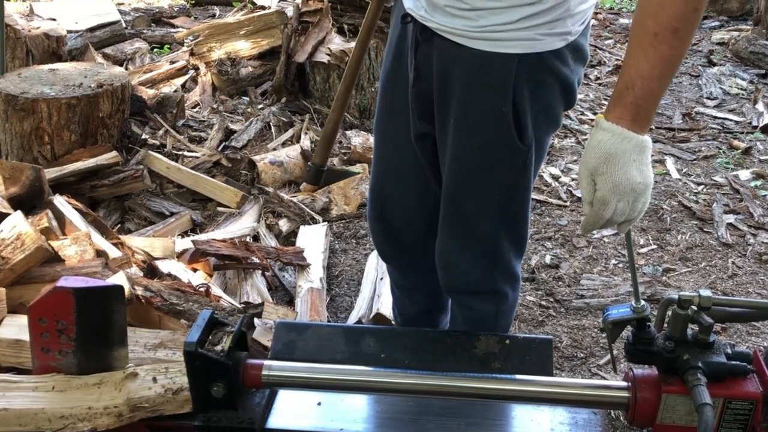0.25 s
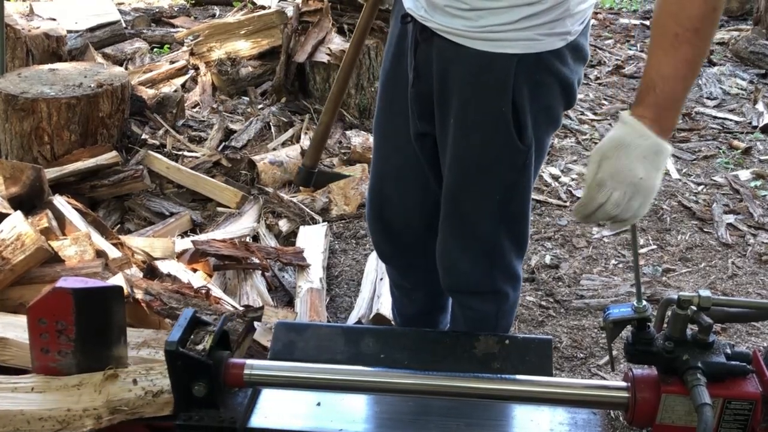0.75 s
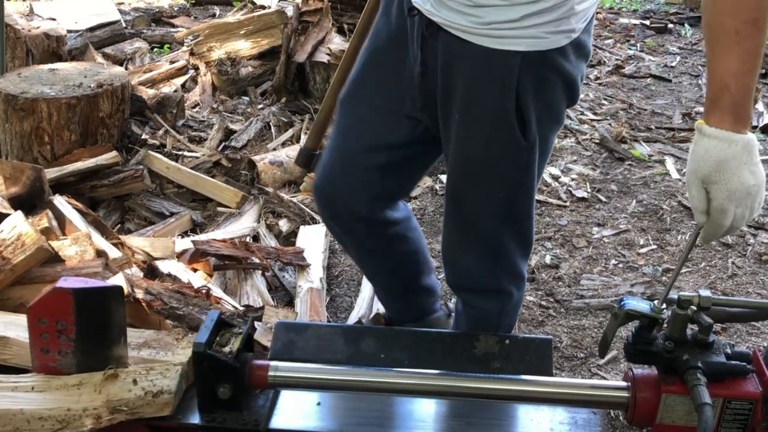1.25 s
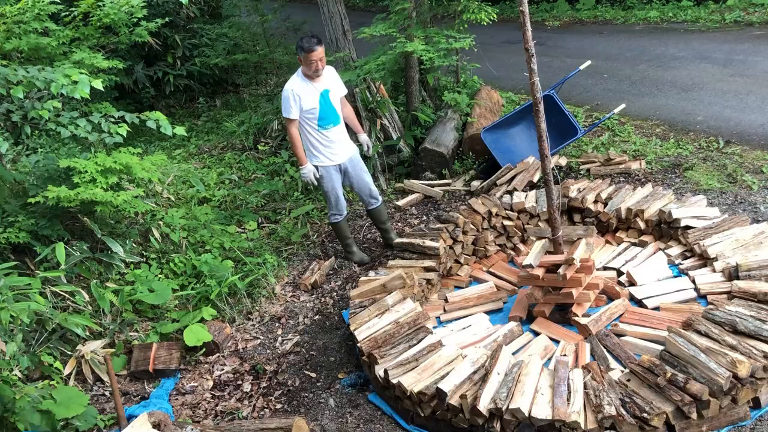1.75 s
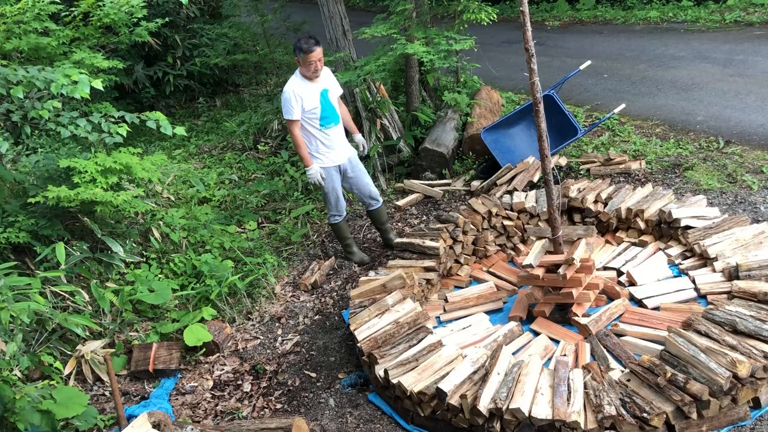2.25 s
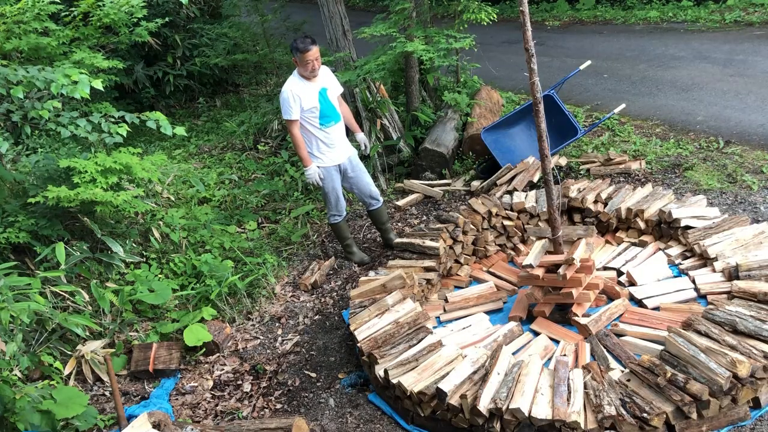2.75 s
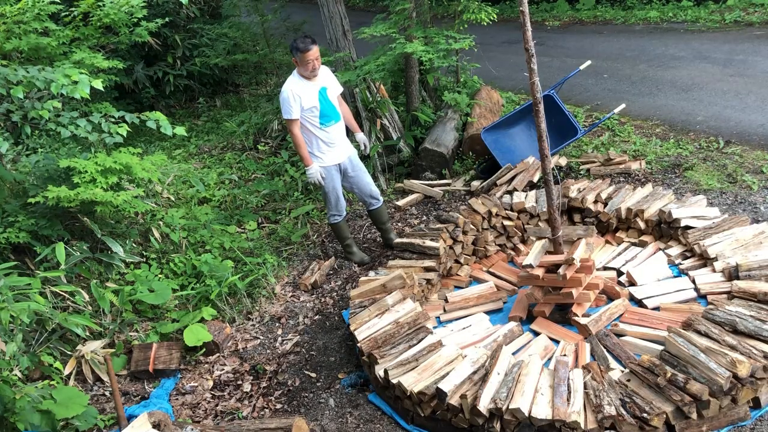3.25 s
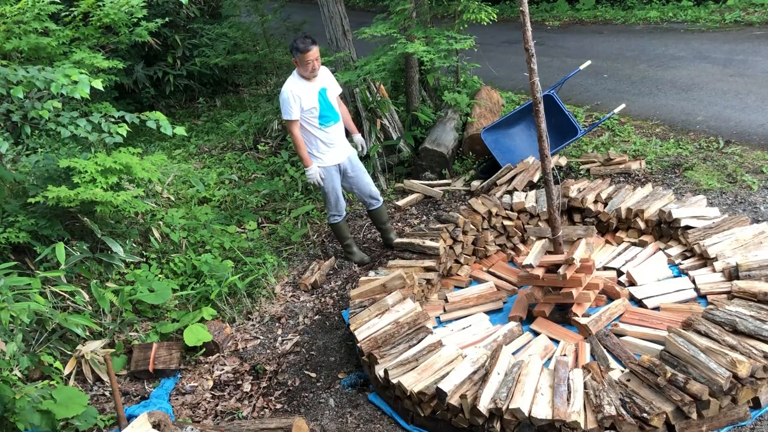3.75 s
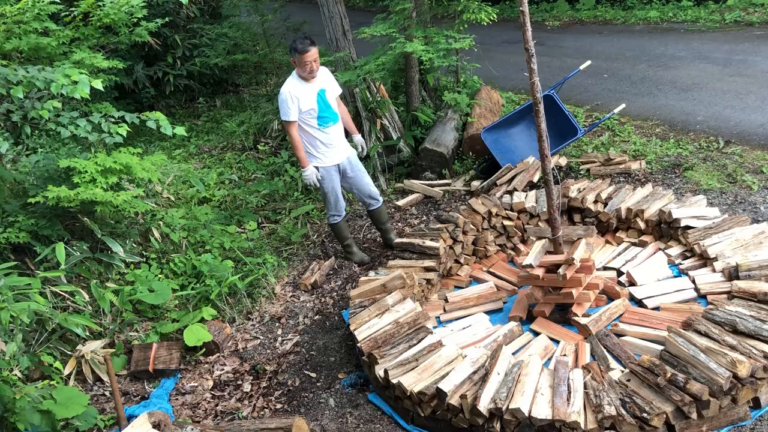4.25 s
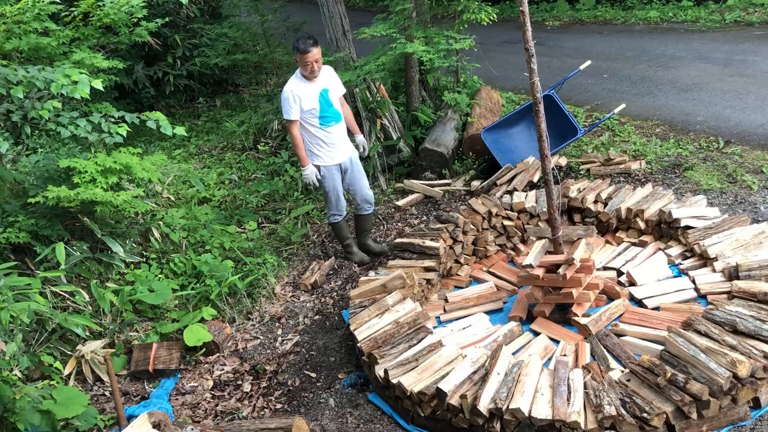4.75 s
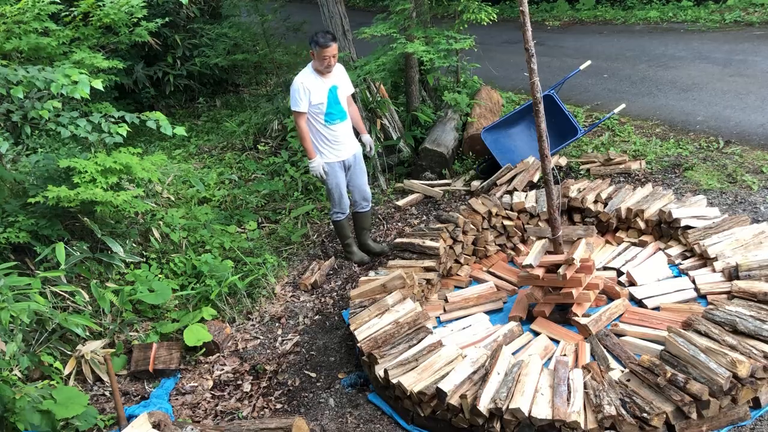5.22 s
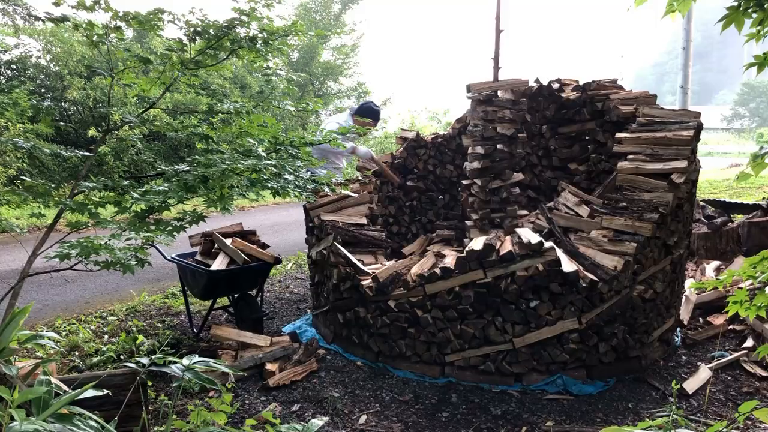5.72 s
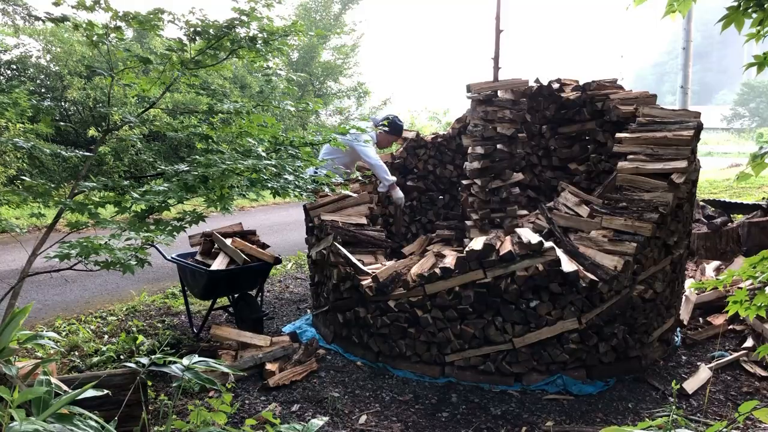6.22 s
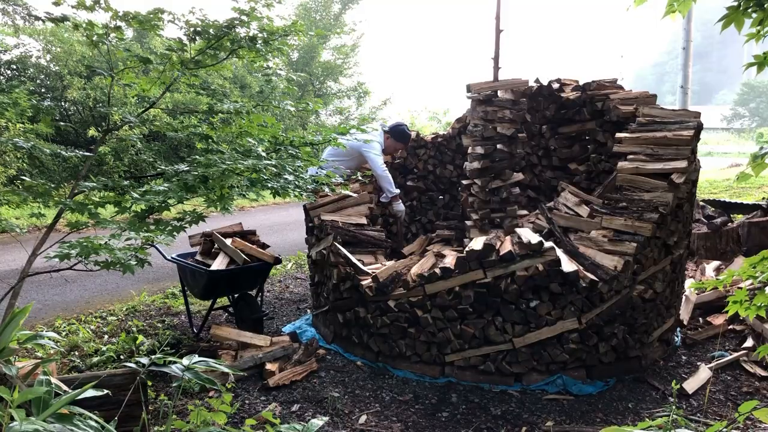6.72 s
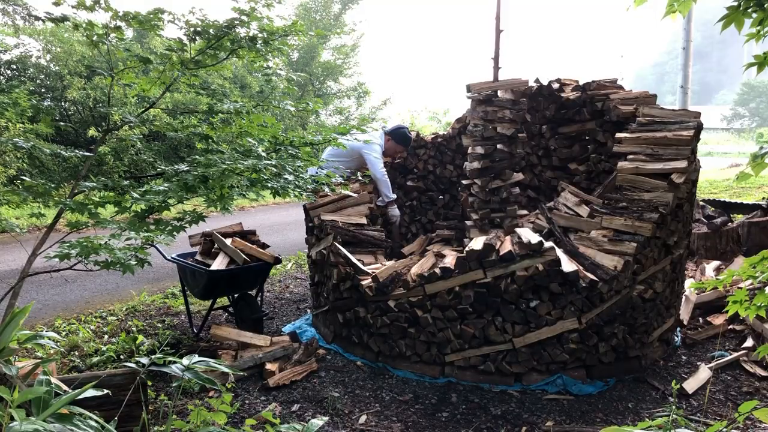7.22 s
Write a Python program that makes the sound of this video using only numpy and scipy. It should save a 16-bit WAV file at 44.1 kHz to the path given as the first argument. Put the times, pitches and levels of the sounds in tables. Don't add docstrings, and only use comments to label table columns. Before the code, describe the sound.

From 0 to 1.66 s a small single-cylinder engine runs loud and close, about 21 firings a second, with throaty exhaust, tinny casing clatter, thin pump whine and a high metallic squeal. Grainy wood snaps scatter over it. From 0.75 it bogs down to about 15 firings; the ram knocks its rail near 0.9-1.0, the hardest cracks land at 0.93 and 0.99, then speed recovers. At 1.66 it cuts dead to a very quiet yard with soft distant hush. A near bird gives brief arched whistles roughly every 0.3 s, alternating high and low, echoing among trees until 5.3. Leaves rustle and twigs tick at 4.6-4.9. At 5.49 the air thins: a falling bird slide at 5.75, a dull log at 5.87, high chirps and throbbing buzzes at 6.1-6.6, a light knock at 6.59, a log set down at 7.33, then a hard bouncing knock at 7.41.

```python
import sys
import numpy as np
from scipy import signal
from scipy.fft import rfft, irfft
from scipy.io import wavfile
from scipy.ndimage import uniform_filter1d

SR = 44100
rng = np.random.default_rng(int(sys.argv[2]) if len(sys.argv) > 2 else 0)


def generate_wav(sig):
    pcm = np.round(np.clip(np.atleast_2d(sig).T, -1, 1) * 32767).astype(np.int16)
    wavfile.write(sys.argv[1], SR, pcm)


def gain_from_decibels(decibels):
    exponent = np.asarray(decibels, float) / 20
    return 10 ** exponent


N = 329868
TIME = np.arange(N) / SR
CUTS = (1.657, 5.491)
FIRST_TURN = .287


def evened(x):
    return x / np.sqrt(np.mean(x ** 2) + 1e-20)


def add(mix, s, sound):
    part = mix[round(s * SR):][:len(sound)]
    part += sound[:len(part)]


def along(rows, t):
    s, *columns = np.transpose(rows)
    return [np.interp(t, s, c) for c in columns]


def coloured(x, points):
    hz = np.fft.rfftfreq(len(x), 1 / SR)
    f, db = np.transpose(points)
    gain = gain_from_decibels(np.interp(np.log(hz + 1), np.log(f + 1), db))
    return evened(irfft(rfft(x) * gain, len(x)))


def resonate(x, hz, width):
    turn = np.exp(2j * np.pi * np.cumsum(hz * np.ones(len(x))) / SR)
    r = np.exp(-np.pi * width / SR)
    return 2 * (turn * signal.lfilter([1 - r], [1, -r], x / turn)).real


def resonate_twice(x, hz, width):
    return resonate(resonate(x, hz, width), hz, width)


def ring(hz, t60, rise, size=6000):
    t = TIME[:size]
    return np.sin(2 * np.pi * hz * t) * gain_from_decibels(-60 * t / t60) * (1 - np.exp(-t / rise))


def woods(x, t60, wet_db):
    t = TIME[:SR // 2]
    tree_line = gain_from_decibels(-6.0) * np.exp(-((t - .17 * t60) / (.07 * t60)) ** 2)
    fall = gain_from_decibels(-60 * t / t60) + gain_from_decibels(-8 - 60 * t / (2.2 * t60)) + tree_line
    sparse = rng.standard_normal(len(t)) * (rng.random(len(t)) < .01)
    taps = sparse * fall * (t > .006) * (1 - np.exp(-t / 0.0095))
    return x + gain_from_decibels(wet_db) * signal.fftconvolve(x, taps / np.linalg.norm(taps))[:N]


def engine():
    # [start_s, firings_per_s]
    speeds = [
        (0.0, 20.94),
        (0.72, 20.72),
        (0.79, 18.8),
        (0.91, 15.07),
        (0.96, 15.4),
        (1.0, 19.2),
        (1.2, 20.15),
        (1.66, 20.42),
    ]
    # [start_s, level_db]
    pressure = [
        (0, -41.5),
        (.74, -41),
        (.82, -33.5),
        (.89, -53),
        (1.0, -45),
        (1.1, -36),
        (1.65, -40),
    ]
    t = TIME[:round(CUTS[0] * SR)]
    speed = along(speeds, t)[0]
    turns = FIRST_TURN + np.cumsum(speed) / SR
    load = 1 - speed / speed[0]
    white = rng.standard_normal(len(t))
    gate_db = valve_gate(turns)
    wobble = uniform_filter1d(rng.standard_normal((2, len(t))), 300)
    teeth = np.sin(2 * np.pi * 48 * turns + (10 + 80 * load) * wobble[0])
    whine = teeth * gain_from_decibels(40 * wobble[1] - 1 - 40 * load + along(pressure, t)[0])
    squeal = evened(resonate(white, 6550, 110) * gain_from_decibels(1.3 * gate_db)) * guard(t) * gain_from_decibels(-10.0)
    rattle = gain_from_decibels(-36.5 - 8 * load) * clatter(white, turns, gate_db)
    return gain_from_decibels(-34.5) * exhaust(turns, speed) + rattle + whine + squeal


def exhaust(turns, speed):
    # [delay_s, pitch_hz, t60_s, rise_s, level_db]
    strokes = [(0.0174, 69, 0.2, 0.012, -23.9), (0.0099, 95, 0.103, 0.012, -9.6),
               (0.0018, 179, 0.096, 0.012, -8.9), (0.0118, 277, 0.047, 0.0003, -18),
               (0.0083, 372, 0.048, 0.0009, -17.5), (0.0081, 520, 0.012, 0.0038, 0.0),
               (0.0156, 512, 0.11, 0.0007, -24), (0.0189, 611, 0.015, 0.0003, -16.6)]
    # [delay_s, pitch_hz, t60_s, rise_s, level_db]
    taps_and_rings = [(0.016, 1550, 0.003, 0.00088, -7.5), (0.031, 1490, 0.004, 0.0013, -13),
                      (0.013, 1200, .008, 0.00049, -36), (0.01236, 136.4, 0.044, 0.011, -19),
                      (0.01864, 645, 0.018, 0.0014, -33), (0.0047, 257, 0.069, 0.0085, -18.5)]
    rings = list(strokes) + list(taps_and_rings)
    lead = round(FIRST_TURN / speed[0] * SR)
    starts = np.r_[0, lead + np.flatnonzero(np.diff(np.floor(turns)))]
    spread = rng.standard_normal((len(starts), len(rings)))
    out = np.zeros(len(turns) + lead)
    for at, chances in zip(starts, spread):
        slowing = speed[max(at - lead, 0)] / speed[0]
        load = 1 - slowing
        for (delay, hz, t60, rise, db), chance in zip(rings, chances):
            sag = slowing ** (1 if t60 * hz > 50 else .15)
            boom_db = 28 * load * np.exp(-((hz - 135) / 50) ** 2)
            boom_db -= load * (30 * (200 < hz < 400) + 10 * (hz == 179) + 10 * (hz < 100))
            chance_db = (.4 + 1.5 * load) * (hz / 200) ** .5 * chance
            hit = gain_from_decibels(db + boom_db + chance_db) * ring(hz * sag, t60, rise)
            add(out, at / SR + delay / sag, hit)
    return evened(out[lead:])


def valve_gate(turns):
    # [cycle_share, width_share, level_db]
    valves = [(.1, 0.028, 3), (.27, 0.041, 4), (.47, 0.16, 4.5), (.72, 0.047, 2.5), (1.0, 0.034, 5)]
    gate_db = 0
    for at, width, db in valves:
        offset = (turns - at + .5) % 1 - .5
        gate_db = gate_db + db * np.exp(-(offset / width) ** 2)
    return gate_db


def clatter(white, turns, gate_db):
    # [pitch_hz, level_db per Hz]
    spectrum = [(30, -62), (100, -10), (250, -8), (320, -13.5), (600, -7.5), (750, -14.5), (850, -18.5),
                (1050, -11.5), (1950, -17), (2500, -15), (4930, -17.5), (6500, -23.5), (16000, -35)]
    # [pitch_hz, width_hz, level_db]
    panels = [(1134, 23, -17), (1370, 17, -22), (1506, 15, -12.5), (1803, 11, -18.5), (2420, 120, -11.5),
              (2720, 8.6, -12.5), (3600, 100, -16), (4060, 10, -16), (4900, 100, -25.5), (5500, 46, -29)]
    pattern = rng.standard_normal(2100)
    repeated = pattern[(turns % 1 * len(pattern)).astype(int)]
    repeated = signal.sosfilt(signal.butter(2, 700, "high", fs=SR, output="sos"), repeated)
    low = signal.butter(2, 2200, fs=SR, output="sos")
    drive = white + signal.sosfiltfilt(low, .85 * repeated - .3 * white) + .3 * repeated
    casing = sum(gain_from_decibels(db) * evened(resonate(drive, hz, width)) for hz, width, db in panels)
    return evened(gain_from_decibels(gate_db) * (coloured(drive, spectrum) + gain_from_decibels(-2.5) * casing))


def guard(t):
    # [start_s, level_db, t60_s]
    shakes = [
        (0, -35.5, 1.4),
        (.18, -37, .4),
        (.625, -29, .12),
        (.72, -50, .2),
        (.934, -46, .1),
        (.988, -20, .1),
        (1.038, -20, .08),
    ]
    level = 0
    for s, db, t60 in shakes:
        swell = 1 - np.exp(-np.maximum(t - s, 0) / 0.011)
        level = level + gain_from_decibels(db - 60 * (t - s) / t60) * swell * (t > s)
    return level


def cracks():
    # [start_s, peak_db, treble_db]
    snaps = [(0.0474, -27, -22), (0.092, -24, -19.5), (0.196, -23.5, -19), (0.2922, -34, -21),
             (0.482, -27, -23), (0.5694, -38, -6), (0.7226, -27, -20), (0.7681, -22.5, -18),
             (0.8114, -41, -18), (0.869, -24.5, -17), (0.9322, -13.5, -15.5), (0.9838, -27, -33),
             (0.9916, -11.5, -16), (1.045, -19.5, -18), (1.097, -30, -10), (1.1474, -33, -13),
             (1.297, -34, -12), (1.455, -37, -11)]
    # [pitch_hz, level_db per Hz]
    spectrum = [(590, -2.5), (1000, -3), (1810, 0), (2740, -5.5), (3580, 0.5), (5570, -0.5), (6250, -3.5),
                (9060, 0.5), (9830, -1), (16000, -9)]
    out, t = np.zeros(N), TIME[:4000]
    for s, db, treble_db in snaps:
        t60 = 0.023 * (1 - 0.015 * (db + 32))
        grain = gain_from_decibels(7.04 * uniform_filter1d(rng.standard_normal(len(t)), 30))
        colour = [(hz, level + (treble_db + 11.0) * (hz > 6000)) for hz, level in spectrum]
        fall = gain_from_decibels(-60 * t / t60) + gain_from_decibels(-20 - 60 * t / .1)
        fall = fall * (1 - np.exp(-t / .003)) ** 2
        add(out, s, gain_from_decibels(db + 4.0) * fall * grain * coloured(rng.standard_normal(len(t)), colour))
    return out


def judder():
    # [start_s, peak_db]
    rail_knocks = [
        (.905, -31),
        (.925, -31),
        (.967, -28),
        (.987, -28),
        (1.007, -26),
    ]
    out = np.zeros(N)
    for s, db in rail_knocks:
        add(out, s, gain_from_decibels(db) * ring(476, 0.032, .003))
    return out


def whistle(hz, db):
    rough = uniform_filter1d(rng.standard_normal(len(hz)), 60)
    tone = np.sin(2 * np.pi * np.cumsum(hz) / SR)
    return gain_from_decibels(db + 10.7 * rough) * tone * signal.windows.tukey(len(hz), .2)


def arch(rise, fall, db, top_hz, shape, warble):
    t = np.arange(-rise, fall, 1 / SR)
    climb_hz, drop_hz, climb_db, drop_db, lag = shape

    def bent(u):
        return abs(u / .02) ** np.where(u < 0, 2, 1.36)

    hz = top_hz - np.where(t < 0, climb_hz, drop_hz) * bent(t)
    hz = hz * (1 + warble * np.sin(2 * np.pi * 140 * t))
    return whistle(hz, db + 2.0 - np.where(t < lag, climb_db, drop_db) * bent(t - lag))


def near_bird():
    # [start_s, rise_s, fall_s, level_db, top_hz]
    notes = [(1.779, 0.02, .026, -47.5, 3300), (2.02, 0.023, .009, -49.5, 2680),
             (2.333, .02, 0.0085, -50.5, 3250), (2.642, 0.019, 0.0063, -51.5, 2685),
             (3.008, .028, 0.0045, -52, 3840), (3.258, 0.02, 0.013, -54.5, 2770),
             (3.532, 0.019, 0.028, -50.5, 3370), (3.778, 0.0207, 0.0047, -48.5, 2690),
             (4.094, 0.011, 0.034, -52.5, 3230), (4.402, .024, .008, -49, 2630),
             (4.683, 0.02, 0.016, -47, 3270), (5.004, 0.023, 0.0035, -53, 2560),
             (5.31, .019, 0.011, -53, 3200)]
    # [start_s, level_db]
    flicks = [(1.762, -57.5), (2.313, -60), (3.514, -58), (4.071, -58.5), (4.660, -58), (5.291, -62)]
    # [start_s, level_db, pitch_hz]
    hooks = [(2.048, -61, 2600), (2.662, -54, 2670), (3.288, -49, 2690), (3.804, -51, 2580),
             (4.433, -49, 2520), (5.030, -53, 2500)]
    # climb_hz, drop_hz, climb_db, drop_db, level_lag_s
    shape = (283, 223, 2.7, 6.8, 0.00092)
    out, u = np.zeros(N), np.linspace(0, 1, 750)
    for s, *row in notes:
        add(out, s, arch(*row, shape, 0.0022))
    for s, db in flicks:
        breath = resonate_twice(rng.standard_normal(len(u)), 2900 + 1900 * u, 1300)
        add(out, s, gain_from_decibels(db) * evened(breath) * np.sin(np.pi * u))
    for s, db, hz in hooks:
        add(out, s, whistle(hz * (1 - 0.26 * u), db - 14.0 * u))
    return woods(out, 0.62, -7.5) * (TIME < CUTS[1])


def handling():
    # [peak_s, level_db, swell_s, fade_s], each time for 12 dB
    shuffles = [
        (4.612, -70, .02, .1),
        (4.705, -64, .09, .06),
        (4.88, -64, .11, 0.06),
        (5.496, -68, .002, .045),
        (5.572, -75, .006, .025),
        (5.625, -76, .03, .09),
    ]
    # [start_s, peak_db, pitch_hz, width_hz, t60_s]
    ticks = [(4.6054, -52, 9000, 5000, .015), (4.7094, -38, 8000, 5000, .015),
             (4.87, -33, 5360, 4000, 0.018), (4.876, -49, 7500, 4000, 0.013),
             (4.9094, -62, 5000, 4000, .015), (5.645, -49, 7000, 6000, .02),
             (5.698, -43, 2000, 2000, 0.026), (5.752, -57, 7000, 1500, .02), (5.491, -56, 9000, 8000, .02),
             (5.796, -38, 4000, 2520, 0.056), (6.2594, -54, 11500, 2000, .02),
             (6.5887, -40.5, 6000, 6000, .02), (6.723, -44, 6800, 2000, .02),
             (6.7374, -42, 5500, 3000, .03), (7.3254, -41, 5000, 6000, .04), (7.335, -43, 3500, 4000, .04),
             (7.4092, -44, 6000, 7000, .015)]
    # [start_s, peak_db, pitch_factor]
    knocks = [
        (5.865, -44, 0.46),
        (5.876, -38, 0.49),
        (6.586, -46.5, 0.84),
        (7.317, -65, 0.53),
        (7.331, -46, 0.47),
        (7.4117, -26, 1.01),
        (7.4225, -38.5, 1.15),
        (7.433, -48, 1.4),
        (7.465, -49, 1.28),
    ]
    # [pitch_hz, level_db, t60_s]
    wood = [(300, -3, 0.034), (430, -11, 0.062), (505, 7.5, 0.03), (705, 2, 0.049), (794, 1.5, 0.032),
            (993, 3, 0.029), (1184, -7, 0.041), (1500, 0.5, 0.022), (2070, -22, 0.015), (2800, -12, 0.029),
            (4312, -9.5, .02), (5600, -17, .02)]
    out, t = np.zeros(N), TIME[:6000]
    for s, db, swell, fade in shuffles:
        span = np.arange(-2 * swell, 2 * fade, 1 / SR)
        lumps = gain_from_decibels(25. * uniform_filter1d(rng.standard_normal(len(span)), 80))
        crackle = rng.standard_normal(len(span)) * lumps
        leaves = evened(resonate(resonate(crackle, 6800, 9000), 7900, 12000))
        add(out, s + span[0], gain_from_decibels(db - 12 * abs(span) / np.where(span < 0, swell, fade)) * leaves)
    for s, db, hz, width, t60 in ticks:
        noise = evened(resonate_twice(rng.standard_normal(len(t)), hz, width))
        add(out, s, gain_from_decibels(db - 15.5 - 60 * t / t60) * (1 - np.exp(-t / .0007)) * noise)
    for s, db, factor in knocks:
        modes = sum(gain_from_decibels(d) * ring(hz * factor, t60, 0.0015) for hz, d, t60 in wood)
        scrape = evened(resonate(rng.standard_normal(len(t)), 1200 * factor, 1500 * factor))
        scrape = scrape * gain_from_decibels(-13.5 - 60 * t / 0.039) * (1 - np.exp(-t / 0.0012))
        add(out, s, gain_from_decibels(db - 9.5) * (modes + scrape))
    return woods(out, 0.09, -14.5)


def far_birds():
    # [start_s, rise_s, fall_s, level_db, top_hz]
    arches = [
        (6.132, .014, 0.04, -59, 6800),
        (6.273, 0.013, 0.028, -58, 6630),
    ]
    # [start_s, length_s, level_db, from_hz, towards_hz]
    slides = [
        (5.701, 0.029, -59.5, 5180, 4270),
        (5.747, 0.21, -62.5, 5060, 2950),
        (6.135, 0.029, -71, 2750, 6000),
        (6.232, .03, -75, 2900, 4300),
    ]
    # [start_s, level_db, pitch_hz, t60_s, fuzz_db]
    buzzes = [(6.04, -77, 7750, 0.47, -9), (6.107, -61.5, 8020, 0.39, -2.5), (6.42, -71, 7700, .4, -1),
              (6.527, -67, 7400, 0.38, -1), (6.955, -80, 7900, .4, 5), (7.03, -74.5, 7140, 0.32, 3.5),
              (7.195, -77, 7600, .25, 4), (7.302, -70, 6400, .06, -20), (7.323, -57, 6100, 0.065, -20),
              (7.431, -62, 6200, .025, -20), (7.445, -59, 6250, .04, -20), (7.453, -58.5, 6000, .07, -20)]
    # climb_hz, drop_hz, climb_db, drop_db, level_lag_s
    shape = (4100, 1350, 6.4, 13, 0.011)
    out, t = np.zeros(N), TIME[:9000]
    for s, *row in arches:
        add(out, s, arch(*row, shape, 0.045))
    for s, length, db, from_hz, to_hz in slides:
        u = np.arange(0, length, 1 / SR)
        hz = to_hz + (from_hz - to_hz) * np.exp(-u / .1)
        add(out, s, whistle(hz * (1 + .006 * np.sin(2 * np.pi * 140 * u)), db + 3.5 - 64 * u))
    for s, db, hz, t60, fuzz_db in buzzes:
        white = rng.standard_normal(len(t))
        core = evened(resonate_twice(white, hz, 350))
        fuzz = evened(resonate(resonate(white, 1.07 * hz, 1300), 1.08 * hz, 1300))
        fuzz = fuzz * gain_from_decibels(fuzz_db - 60 * t / 0.76)
        throb = (1 + .5 * np.sin(2 * np.pi * 58 * t)) / (1 + (t / .11) ** 8)
        level = gain_from_decibels(db - 60 * t / t60) * (1 - np.exp(-t / 0.0033))
        add(out, s, level * throb * (core + fuzz))
    return woods(out, .2, -8.5)


def air():
    # [pitch_hz, level_db per Hz]
    yard_spectrum = [(15, -42), (25, -9.5), (102, -1), (166, -2), (263, -0.5), (317, -1), (754, -3.5),
                     (1650, -8), (2910, -16), (4490, -16.5), (6210, -22.5), (14800, -34), (16000, -32)]
    # [pitch_hz, level_db per Hz]
    stack_spectrum = [(15, -38), (25, 5), (64, 2), (141, 3.5), (229, -1), (394, 3), (560, -1), (1260, -4.5),
                      (2050, -9), (4740, -13), (7920, -18.5), (14400, -29), (16000, -32)]
    swell = evened(uniform_filter1d(rng.standard_normal(N), 2500))
    yard = gain_from_decibels(-57.5 + 0.57 * swell) * coloured(rng.standard_normal(N), yard_spectrum)
    stack = gain_from_decibels(-62.5 + 0.25 * swell) * coloured(rng.standard_normal(N), stack_spectrum)
    return np.where(TIME < CUTS[1], yard, stack) * (TIME > CUTS[0])


def scene():
    mix = cracks() + judder() + near_bird() + handling() + far_birds() + air()
    add(mix, 0, engine())
    return mix[None]


def top_cut(x):
    return signal.sosfilt(signal.butter(12, 16630, fs=SR, output="sos"), x)


def record(dry):
    cut = signal.sosfilt(signal.butter(3, 38, "high", fs=SR, output="sos"), dry)
    edge = signal.firwin(511, 15750, window=("kaiser", 9), fs=SR)
    mix = signal.oaconvolve(cut, edge[None], "same")
    return top_cut(mix)


dry = scene()
out = record(dry)
generate_wav(out)
```